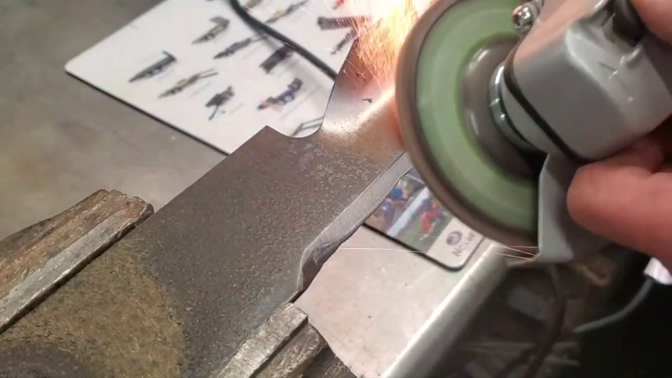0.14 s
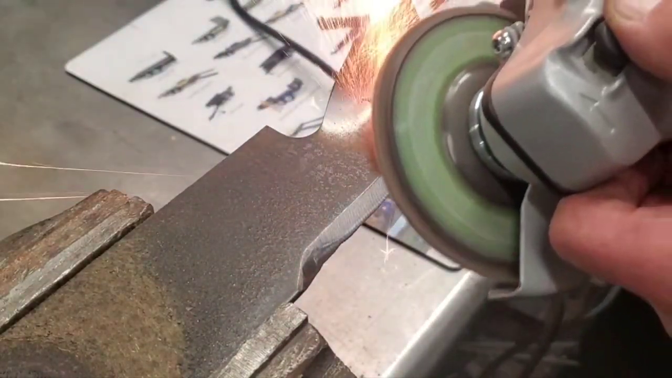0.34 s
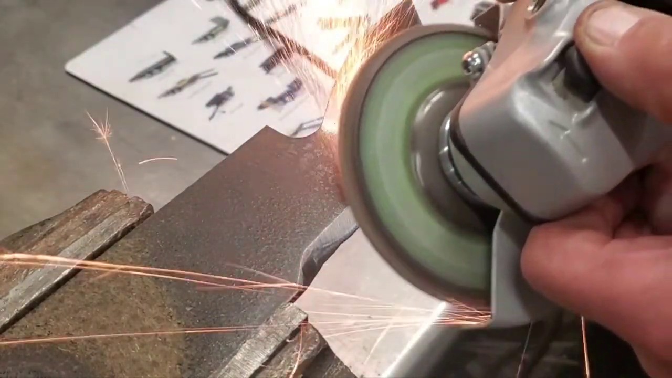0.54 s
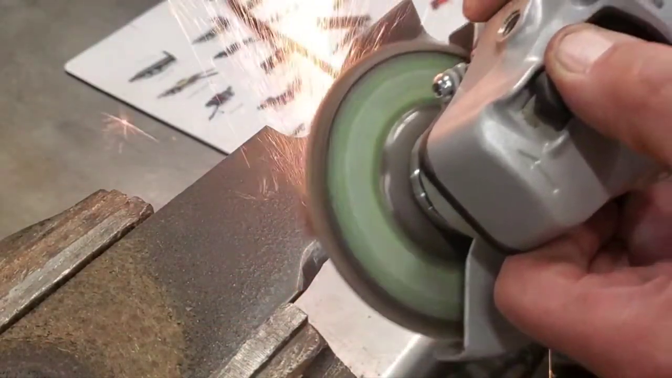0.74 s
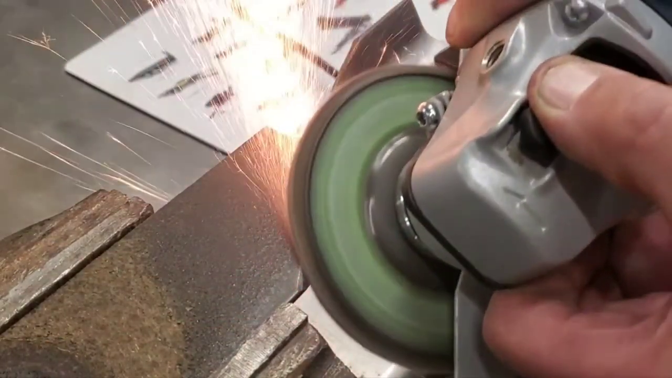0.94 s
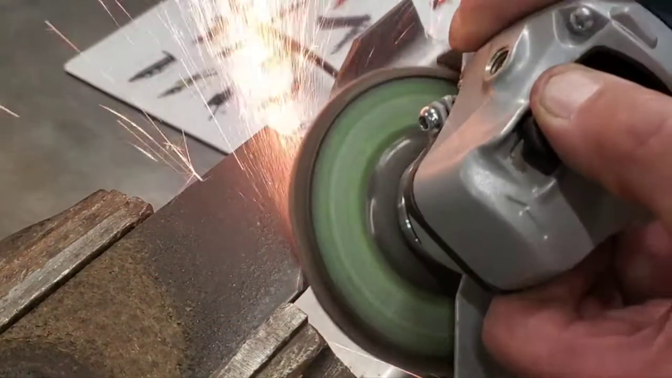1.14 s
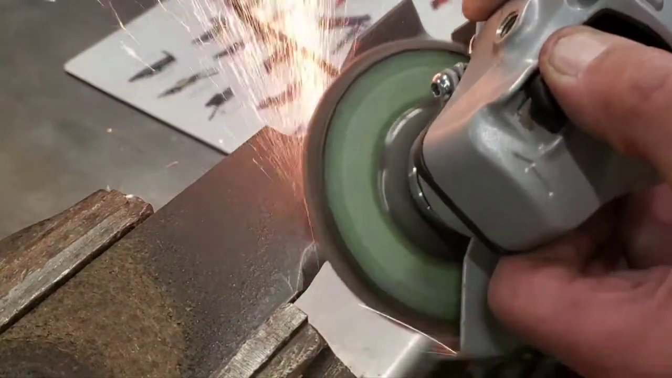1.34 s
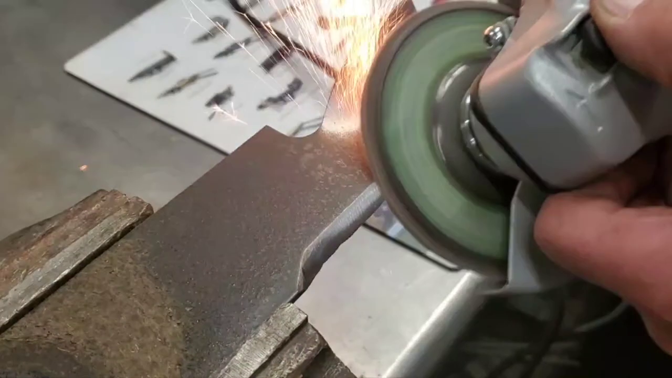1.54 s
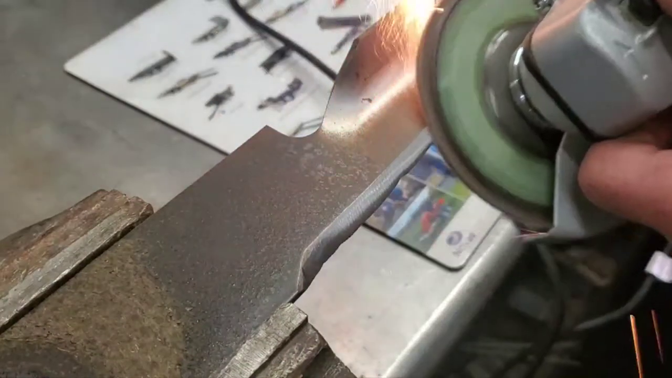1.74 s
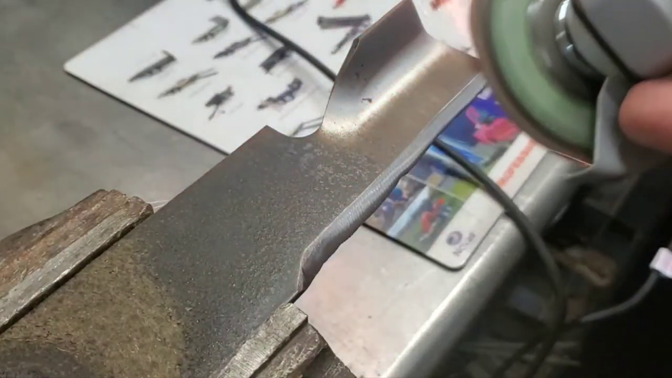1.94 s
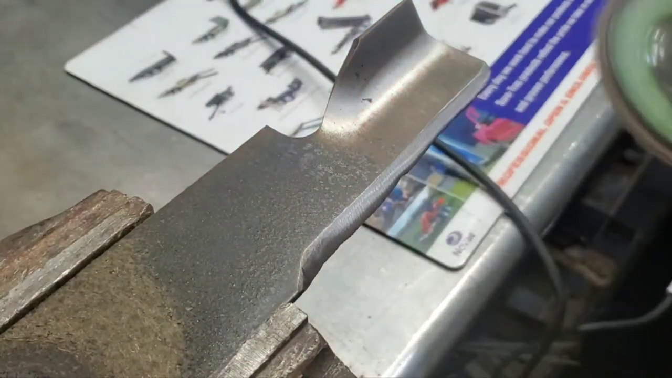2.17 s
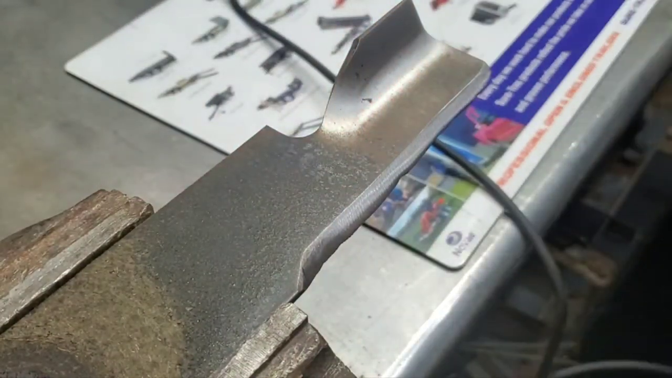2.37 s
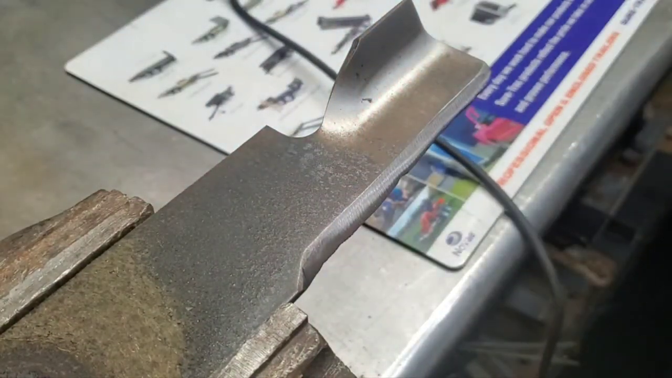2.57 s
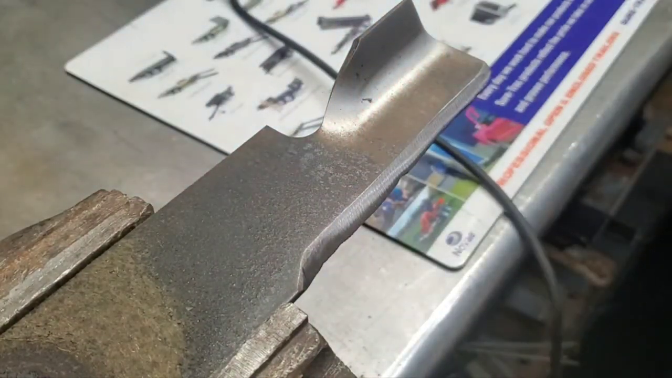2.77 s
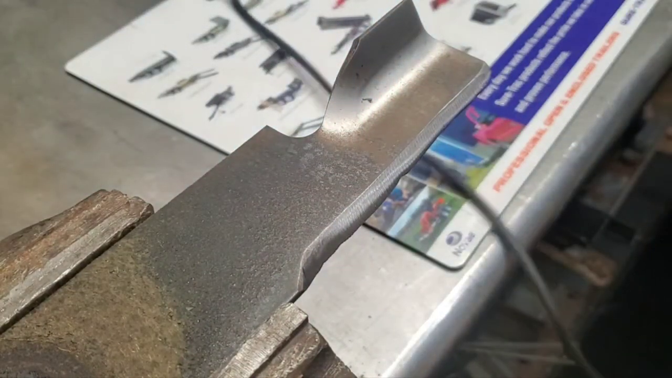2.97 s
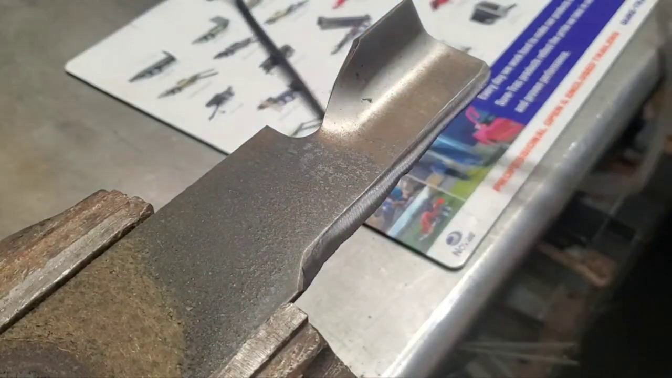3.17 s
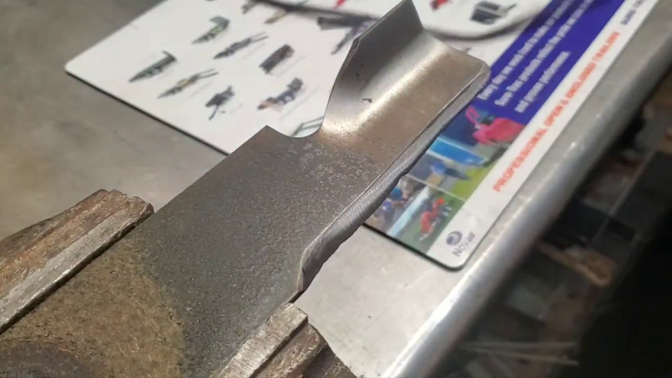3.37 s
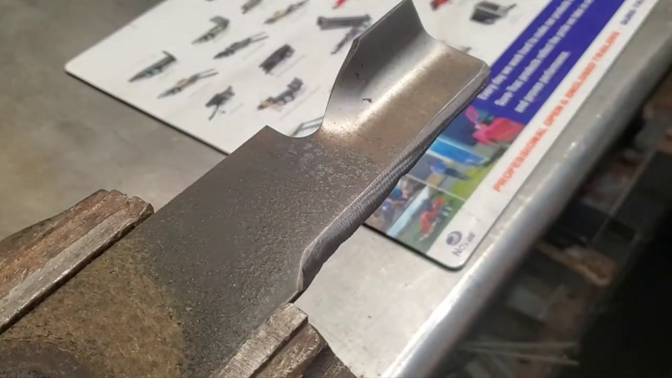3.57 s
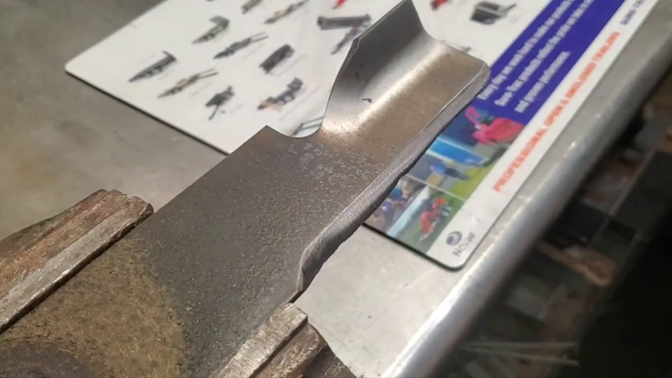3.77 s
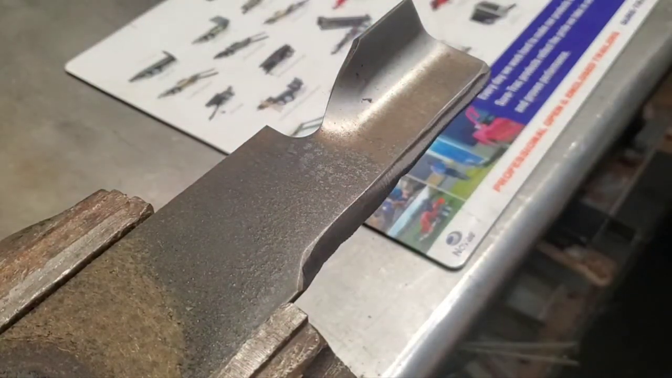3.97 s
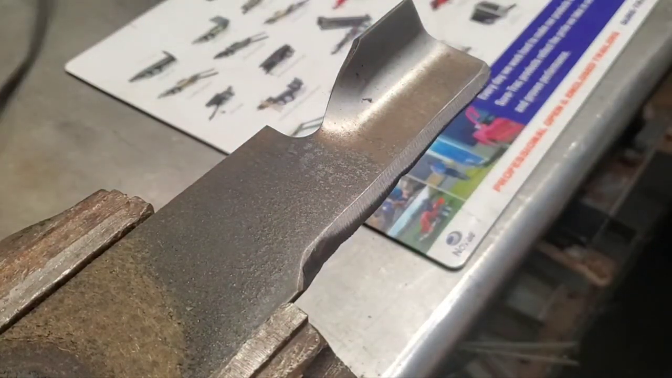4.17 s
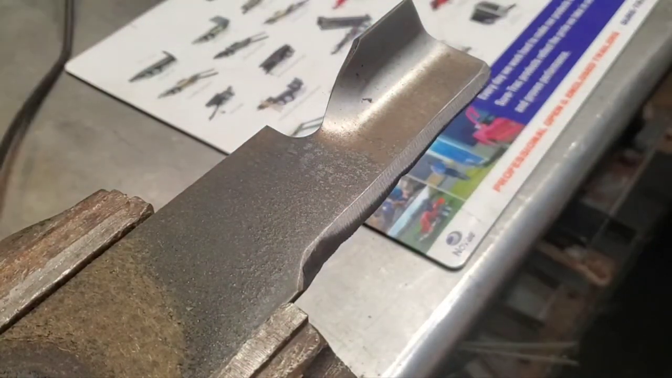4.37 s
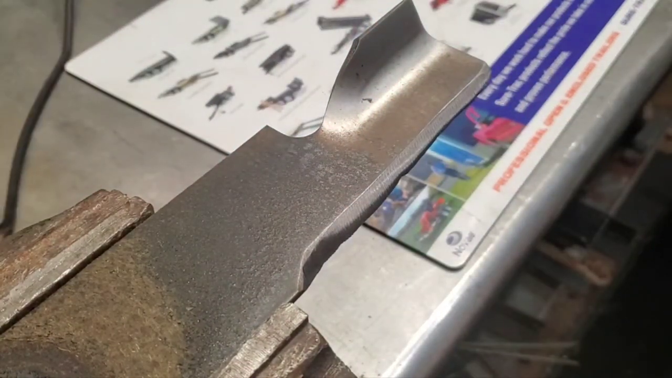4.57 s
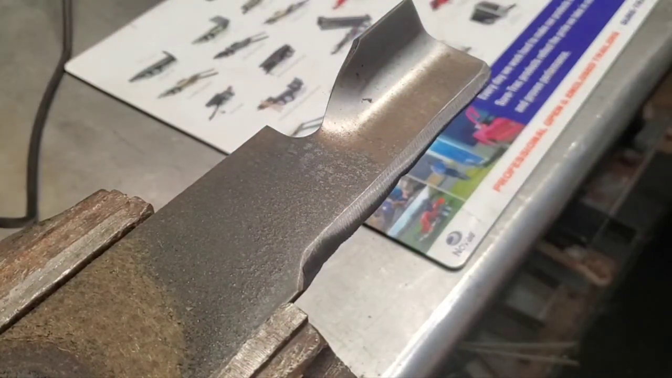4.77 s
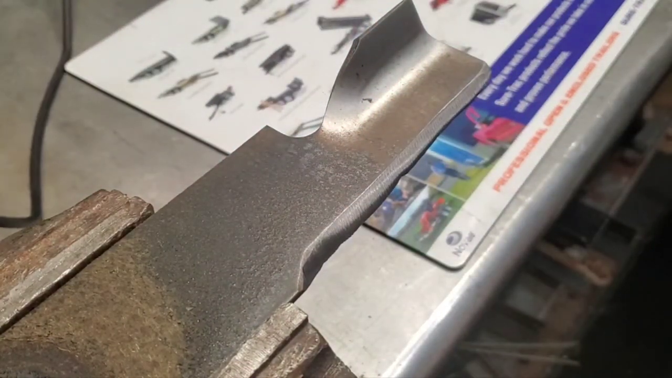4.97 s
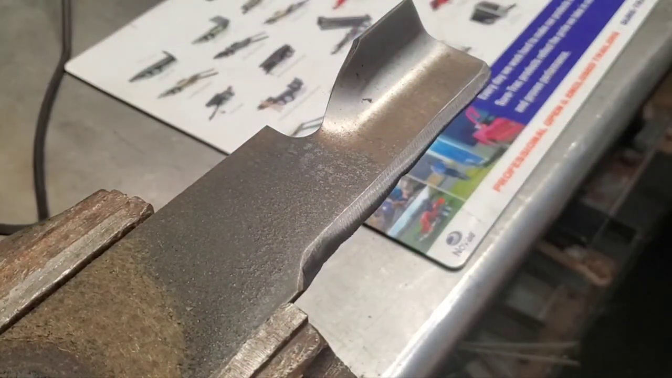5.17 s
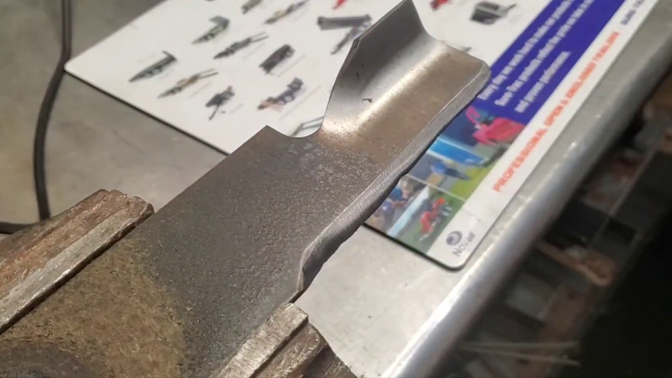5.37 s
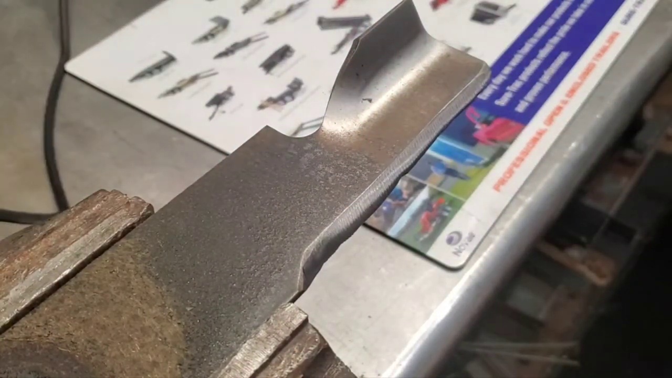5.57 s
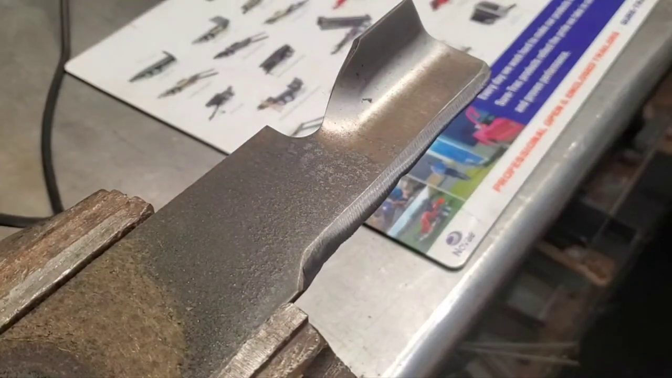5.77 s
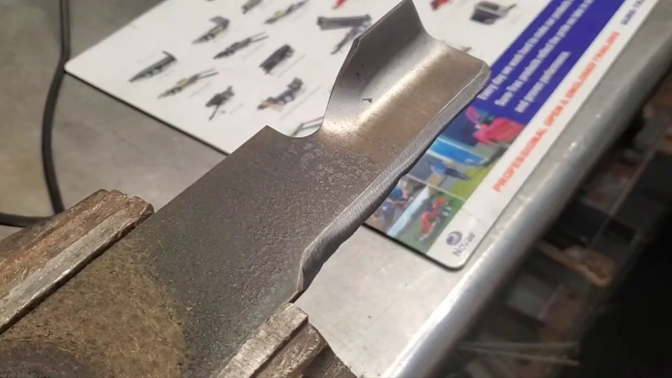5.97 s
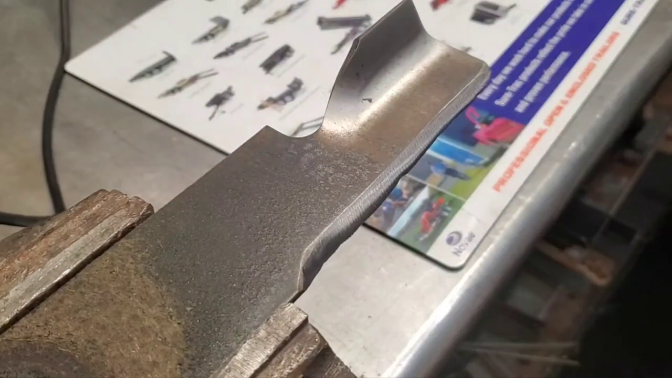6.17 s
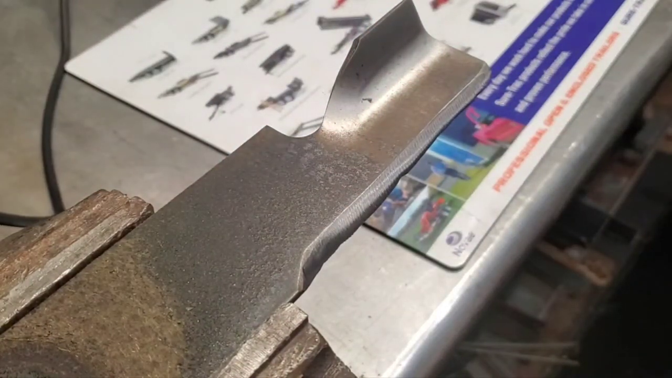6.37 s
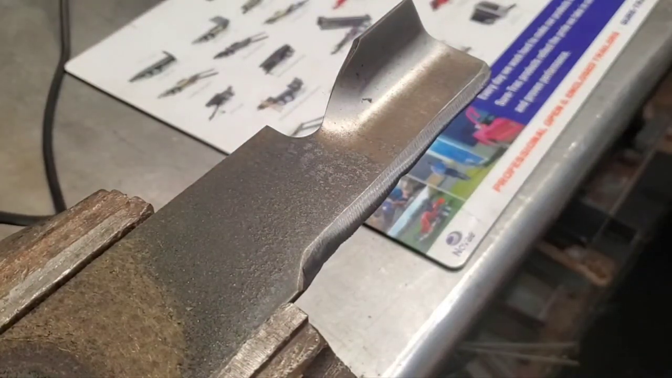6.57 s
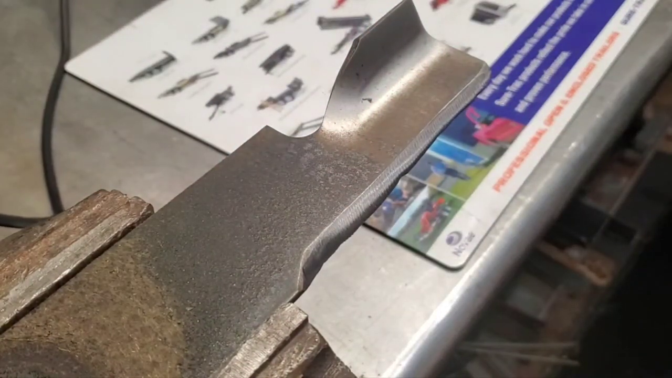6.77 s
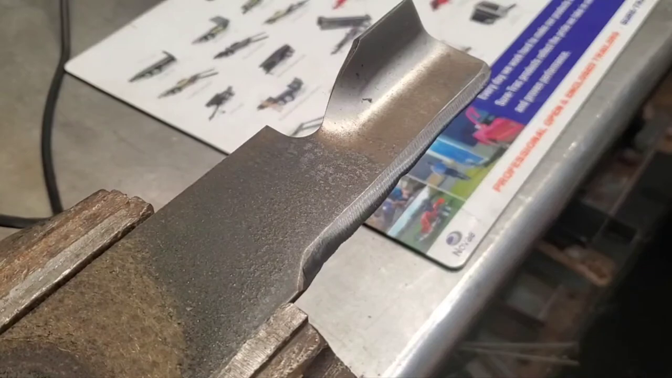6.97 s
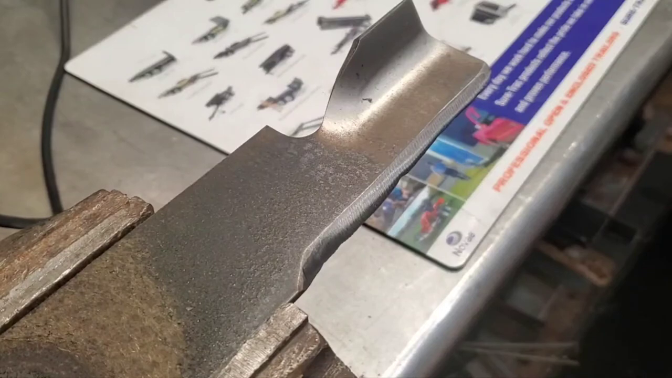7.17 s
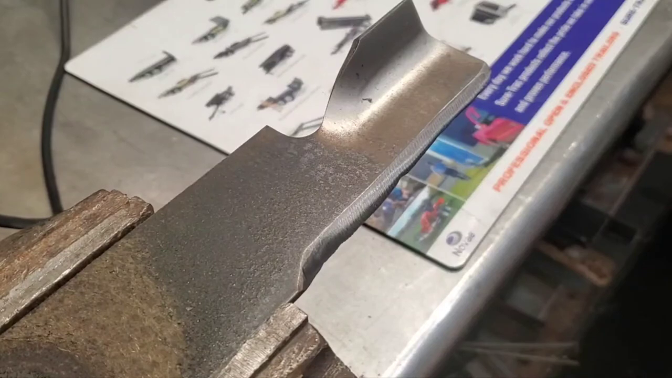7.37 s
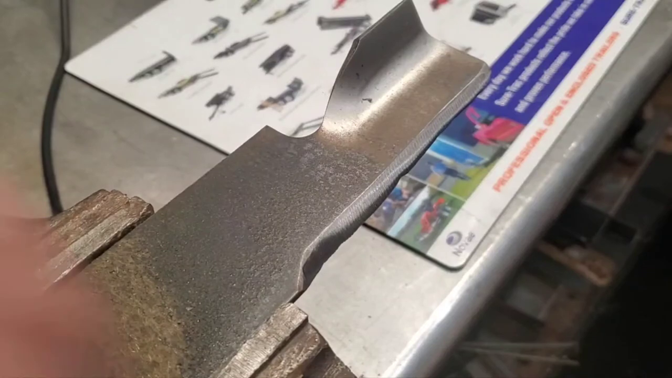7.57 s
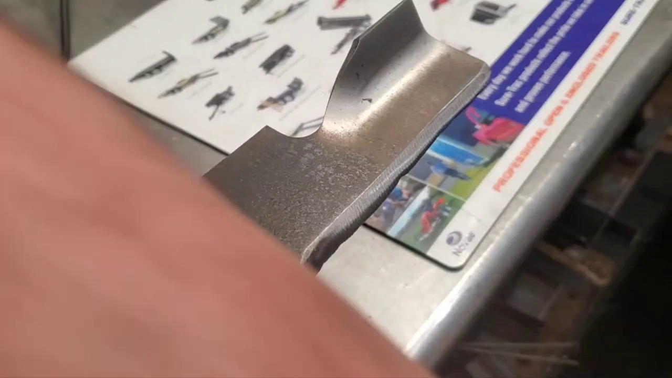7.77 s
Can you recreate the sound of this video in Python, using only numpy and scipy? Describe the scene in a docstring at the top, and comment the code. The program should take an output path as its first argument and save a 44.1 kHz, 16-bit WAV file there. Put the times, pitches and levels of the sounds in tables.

```python
"""A harsh hiss and gear whine over ringing steel: an angle grinder's flap disc sharpens a blade
clamped in a vise, close by in a garage. It lifts off, is switched off and coasts down, its bevel
gears clacking while it is carried aside and the cord knocks on the bench. After a few soft
shuffles the starting current slams the gears into a rattle; the motor runs free for a second,
fan rushing and brushes sizzling, and is switched off once more."""
import sys
import numpy as np
from scipy import signal
from scipy.fft import rfft, irfft, next_fast_len
from scipy.io import wavfile
from scipy.ndimage import uniform_filter1d, map_coordinates

SR = 44100
rng = np.random.default_rng(int(sys.argv[2]) if len(sys.argv) > 2 else 0)


def materialize(psi):
    """Save the field psi as 16-bit PCM at rate SR to the path in sys.argv[1].

    A 1-D psi becomes a single channel; in a 2-D psi each row is a channel.
    """
    bounded = np.clip(np.atleast_2d(psi).T, -1, 1)
    quanta = np.round(bounded * 32767).astype(np.int16)
    wavfile.write(sys.argv[1], SR, quanta)


N = 345296
T = np.arange(N) / SR

PINION_TEETH, CROWN_TEETH, MAINS_HZ = 9, 32, 60
FREE_HZ = 550  # rotor speed the unloaded motor heads for
LIFTED_S, SWITCH_OFF_S, SWITCH_ON_S, SWITCH_OFF_AGAIN_S = 2.228, 2.21, 6.468, 7.69

# broad colour of the gearbox shell: freq_hz, level_db
SHELL_COLOUR = [(450, -10), (1400, -9), (1900, 0.5), (2500, 1), (3200, 4), (5000, 1), (6000, -18),
                (6900, -6.5), (7800, -29.5), (13000, -11.5), (16000, -14)]
# ringing modes of the gearbox shell: pitch_hz, width_hz, level_db
SHELL_MODES = [(543, 35, -2.5), (2054, 280, -4), (3185, 150, -1.5), (4013, 194, 0.5), (4334, 62, 1),
               (5070, 99, -5.5), (6850, 140, -12)]


def amp(db):
    """Decibels to gain."""
    return 10 ** (np.asarray(db) / 20)


def unit(x):
    """Scales to rms 1."""
    return x / np.sqrt(np.mean(x ** 2) + 1e-20)


def levelled(x, size=5000):
    """Holds the running rms, taken over size samples, near 1."""
    return x / np.sqrt(uniform_filter1d(x ** 2, size=size))


def curve(rows, column=1):
    """One column of a table, joined by straight lines in time."""
    rows = np.array(rows)
    return np.interp(T, rows[:, 0], rows[:, column])


def gate(start_s, end_s, ramp_s):
    """1 between start and end, with short ramps."""
    return np.clip(np.minimum(T - start_s, end_s - T) / ramp_s, 0, 1)


def spectrum(points, hz):
    """Reads a table on a log-frequency axis."""
    f, value = np.transpose(points)
    return np.interp(np.log(hz + 1), np.log(f + 1), value)


def filtered(x, response):
    """Applies a frequency response given as a function of Hz."""
    size = next_fast_len(N + 8192)
    return irfft(rfft(x, size) * response(np.fft.rfftfreq(size, 1 / SR)), size)[..., :N]


def coloured(x, points):
    """Minimum-phase EQ through points of freq_hz, level_db."""
    log_gain = np.log(amp(spectrum(points, abs(np.fft.fftfreq(4096, 1 / SR)))))
    taps = np.fft.ifft(np.exp(np.conj(signal.hilbert(log_gain)))).real
    return signal.oaconvolve(x, taps[:len(taps) // 2])[:N]


def ring(x, modes):
    """A bank of steady resonances, each given as pitch_hz, width_hz, level_db."""
    return filtered(x, lambda f: sum(amp(db) * 1j * f * width / (hz ** 2 - f ** 2 + 1j * f * width)
                                     for hz, width, db in modes))


def resonate(x, hz, width_hz):
    """A resonance whose centre follows the curve hz."""
    carrier = np.exp(2j * np.pi * np.cumsum(hz) / SR)
    pole = np.exp(-np.pi * width_hz / SR)
    return 2 * (carrier * signal.lfilter([(1 - pole) ** 2], [1, -2 * pole, pole ** 2], x / carrier)).real


def white():
    """White noise."""
    return rng.standard_normal(N)


def wander(rate_hz):
    """Smooth random drift of rms 1."""
    return unit(filtered(white(), lambda f: np.exp(-(f / rate_hz) ** 2)))


def tone(turns):
    """A sine of rms 1 and random phase."""
    return np.sqrt(2) * np.sin(2 * np.pi * (turns + rng.random()))


def throb(turns, depth):
    """One swell a turn, of mean power 1; a greater depth sharpens it to a blow."""
    return levelled(np.exp(depth * np.cos(2 * np.pi * turns)), size=2205)


def bursts(rows, rise_s, decay_s):
    """Noise that swells and dies at every row of start_s, level_db."""
    level, t = np.zeros(N + SR), np.arange(SR // 2) / SR
    shape = (1 - np.exp(-t / rise_s)) * np.exp(-t / decay_s)
    for start_s, db in rows:
        level[round(start_s * SR):][:len(t)] += amp(db) * shape / shape.max()
    return level[:N] * white()


def around(make, shared):
    """A sound from no clear direction: partly the same on both sides."""
    return np.sqrt(shared) * make() + np.sqrt(1 - shared) * np.array([make(), make()])


def coasted(start_hz, t, friction_hz_per_s=78.8, drag_s=3.45):
    """Speed after t seconds without power: dry friction is steady, air drag grows with speed."""
    friction_hz = friction_hz_per_s * drag_s
    return np.maximum((start_hz + friction_hz) * np.exp(-np.maximum(t, 0) / drag_s) - friction_hz, 0)


def rotor_speed(half_speed_s=0.143):
    """Turns per second: dragged by the steel, coasting to rest, spinning up, and coasting again."""
    # the rotor labouring against the steel: time_s, speed_hz
    loaded_speed = [(0, 491), (0.45, 457), (0.75, 442), (1.03, 441), (1.4, 413.5), (1.65, 412.3),
                    (1.92, 407), (2.1, 411), (2.21, 424)]
    first_run = coasted(curve(loaded_speed), T - SWITCH_OFF_S)
    powered_s = np.clip(T, SWITCH_ON_S, SWITCH_OFF_AGAIN_S) - SWITCH_ON_S
    spin_up = FREE_HZ * powered_s / (powered_s + half_speed_s)
    return first_run + coasted(spin_up, T - SWITCH_OFF_AGAIN_S)


def current(speed, running):
    """Share of the full starting current, which falls as the motor gains speed."""
    return running * np.clip(1 - speed / FREE_HZ, 0, 1)


def grinding(disc, contact, load, grit_memory=0.37, grains_per_turn=400):
    """Returns scrape and ring: the same wearing grit passes each turn, and the flaps slap the blade."""
    # hiss of the grit: freq_hz, level_db
    grit_colour = [(110, -5.5), (300, -5.5), (700, -5), (1300, 6), (4500, -6), (5600, 1.5), (12000, 6),
                   (16000, 4.5)]
    # ring of the clamped blade: pitch_hz, width_hz, level_db
    blade_modes = [(692, 18, -10), (900, 500, -24), (1267, 230, -16), (1499, 20, 0)]
    # higher blade modes, scraped by the grit under load: pitch_hz, width_hz, level_db
    shrill_modes = [(3080, 350, 4), (7320, 190, 5.5), (8370, 260, 0)]
    # how freely the blade rings as the disc travels along it: time_s, level_db
    ringing = [(0, -10), (.65, -1.5), (.73, 2.5), (.92, 5), (1.02, -17), (1.6, 0.5), (2.2, -4)]
    grains = rng.standard_normal((int(disc[-1]) + 2, grains_per_turn))
    track = signal.lfilter([1], [1, -grit_memory], grains, axis=0).ravel()  # repeats comb the hiss
    scratch = unit(map_coordinates(track, [disc * grains_per_turn], mode="nearest"))
    hiss = unit(coloured(scratch * throb(disc, depth=0.85) * amp(0.92 * wander(24)), grit_colour))
    shrill = load * ring(scratch, shrill_modes)
    slaps = sum(tone(k * disc) for k in range(4, 19))
    blade = ring(slaps * amp(2 * wander(5.1)), blade_modes)
    bite = contact * amp(-29)
    return bite * (amp(2) * hiss + amp(3.5) * shrill), bite * amp(curve(ringing) - 4) * blade


def gear_whine(speed, rotor, disc, contact, load, running, loaded_db=-37, start_db=-27, idle_db=-57.5):
    """The mesh whines with torque, with sidebands from the wobbling crown wheel."""
    # tones of rotor and gears: rotor_multiple, level_db
    orders = [(8, -2), (9, 6), (10, 1)]
    # the hand leans in once on each pass along the blade: centre_s, boost_db
    pushes = [(0.48, 6.1), (1.42, 2.1)]
    wobble = 1 + 0.5 * tone(disc) + 0.47 * tone(2 * disc)
    whine = sum(amp(db + 2 * wander(6)) * tone(round(k) * rotor + 0.073 * wander(250))
                for k, db in orders)
    push_db = sum(db * np.exp(-((T - centre_s) / 0.47) ** 2) for centre_s, db in pushes)
    # a hard push brings out the sideband just below the mesh tone
    sideband = amp(4) * load * np.clip(push_db / 2, 0, 1) * tone(PINION_TEETH * rotor - disc)
    meshing = np.clip(speed / 400, 0, 1) ** 5  # slow teeth knock instead of singing
    torque = contact * amp(loaded_db + push_db) + current(speed, running) * amp(start_db) + amp(idle_db)
    return torque * amp(wander(240)) * meshing * (whine * wobble + sideband)


def shell_band(f, low_slope):
    """Response of the band that the gearbox shell lets through."""
    return (1 - 1 / (1 + (f / 1500) ** low_slope)) / (1 + (f / 7100) ** 20)


def mesh_whirr(blows, speed):
    """Struck teeth ring near multiples of the mesh rate, loudest where these cross a shell mode."""
    mesh_hz = np.maximum(PINION_TEETH * speed, 1600)
    slowness = np.clip(1 - speed / 520, 0, 0.5)  # slow teeth strike with a stronger octave
    mesh = resonate(blows, 1.03 * mesh_hz, width_hz=1370)
    mesh += amp(-5.5 + 25.7 * slowness) * resonate(blows, 2 * mesh_hz, width_hz=1200)
    mesh += amp(-8) * resonate(blows, 3 * mesh_hz, width_hz=2100)
    mesh = filtered(mesh, lambda f: shell_band(f, low_slope=6))
    return np.clip(speed / 190, 0, 1) * (amp(9.5) * mesh + amp(7.5) * ring(mesh, SHELL_MODES))


def gear_chatter(speed, disc, crests, running, contact, loaded_db=-26.5, free_db=-28, coast_db=-35):
    """Loose teeth strike at random, shaking the mesh, the bearings and the shell."""
    # fits in which the coasting gears rattle hard: start_s, end_s, boost_db
    fits = [(3.32, 3.48, 2.5), (3.795, 3.883, 5.5), (4.14, 4.215, 5), (4.348, 4.422, 6)]
    strikes_per_s = 1.5 * speed + (running + contact) * 4000
    strikes = (rng.random(N) < strikes_per_s / SR) * amp(2 * np.minimum(rng.exponential(1, N), 2))
    force = signal.lfilter([1], [1, -np.exp(-1 / (0.001 * SR))], strikes) + 0.2
    disc_phase = disc - np.interp(7.605, T, disc - crests)  # in step with the torque ripple at 7.605 s
    blows = white() * force * throb(disc_phase, depth=0.43) * throb(crests, depth=running * 0.51)
    # near full speed the ripple beats against the disc's turn and throws the teeth loose in pulses
    beat = running * np.clip((speed - 452) / 15, 0, 1) * np.cos(2 * np.pi * (disc_phase - crests))
    # the coasting rotor shakes in its bearings around 145 turns a second
    shake = np.exp(-((speed - 145) / 98) ** 2) * np.minimum(speed / 2, 1) * (T < SWITCH_ON_S)
    bearings = shake * ring(blows, [(1110, 360, 9.9), (2040, 670, 8.8)])
    singing = running * np.clip(speed / 430, 0, 1) ** 10 * ring(blows, [(4040, 60, 22)])
    rasp = np.maximum(beat, 0) * ring(blows, [(4960, 210, 18)])
    shell = coloured(blows, SHELL_COLOUR) + amp(2) * ring(blows, SHELL_MODES)
    chatter = levelled(mesh_whirr(blows, speed) + bearings + singing + rasp + shell)
    fits_db = wander(19) + sum(db * gate(start, end, ramp_s=0.0098) for start, end, db in fits)
    coasting = (1 - contact - running) * np.hypot((speed / 400) ** 1.7, shake) * amp(coast_db + fits_db)
    torque_db = 12 * current(speed, running) + 2.5 * beat
    powered = running * np.clip((speed - 260) / 130, 0, 1) * amp(free_db + torque_db)
    return chatter * (contact * amp(loaded_db) + powered + coasting)


def fan_rush(speed):
    """The cooling fan blows through vents on either side, louder with speed."""
    # rush of the fan: freq_hz, level_db
    fan_colour = [(130, -26), (800, -6), (2000, 0), (4200, 4.5), (9000, -8), (16000, -7)]
    rush = around(lambda: unit(coloured(white(), fan_colour)), shared=0.27)
    return amp(-27.5) * (speed / 450) ** 1.84 * rush


def unbalance_hum(speed, rotor, disc, contact):
    """Rotor and disc each hum once a turn, the disc more when it presses on the steel."""
    # rotor hum, lifted by a resonance of the casing: speed_hz, level_db
    hum_levels = [(130, -67), (220, -66), (360, -55.5), (412, -39.5), (500, -43)]
    rotor_hum = amp(np.interp(speed, *np.transpose(hum_levels))) * tone(rotor)
    disc_hum = amp(-55.5 + 3 * contact) * (speed / 450) ** 2 * tone(disc)
    return (rotor_hum + disc_hum) * amp(wander(20))


def room_tone():
    """The still air of the garage, a faint dark noise all around."""
    # colour of the air: freq_hz, level_db
    air_colour = [(25, -37), (85, -6), (200, -13), (540, -7.5), (4600, -19), (8000, -30.5), (16000, -33)]
    return amp(-51) * around(lambda: unit(coloured(white(), air_colour)), shared=0.43)


def blade_squeal(rotor, load):
    """The loaded blade squeals at twice the mesh rate, and two rotor orders higher when pressed hard."""
    octave = 2 * PINION_TEETH * rotor + 0.054 * wander(89)
    return amp(-35.5) * load * tone(octave) + amp(-42) * load ** 2 * tone(octave + 2 * rotor)


def gear_clacks(speed, running, rebound_s=0.0082, rebound_db=-13):
    """Teeth knock and bounce back; fast ones ring at the mesh rate, slow ones wake the shell."""
    # hard knocks of the teeth across their play: start_s, level_db
    clacks = [(2.499, -15.5), (2.539, -19), (2.546, -14), (2.5717, -20), (2.801, -18), (3.149, -26),
              (3.4395, -17.5), (3.558, -21), (3.7592, -22.5), (3.7992, -20), (3.8078, -15), (3.825, -13),
              (3.85, -16.5), (3.8678, -13), (3.949, -19.5), (3.9807, -20.5), (4.01, -16), (4.1085, -16.5),
              (4.1538, -23), (4.1674, -10.5), (4.1909, -11), (4.206, -16), (4.2423, -14.5), (4.2902, -14.5),
              (4.314, -16.5), (4.331, -20), (4.3471, -12.5), (4.391, -16), (4.441, -19.5), (4.47, -16.5),
              (4.503, -18.5), (4.5463, -19.5), (4.5739, -19.5), (4.594, -18), (4.6127, -17),
              (4.6344, -17.5), (4.696, -21), (4.7089, -11.5), (4.729, -19.5), (4.794, -18.5), (4.82, -17.5),
              (4.853, -22), (4.8783, -16), (4.894, -18), (4.9367, -20), (4.956, -22), (4.9852, -23),
              (5.0213, -23), (5.0414, -23.5), (5.0995, -11), (5.12, -16.5), (5.1438, -15.5), (5.209, -21),
              (5.296, -26), (5.326, -21.5), (6.4685, -20), (6.4753, -16.5), (6.702, -20)]
    delays = rebound_s * (0.5 + rng.random(len(clacks)))
    rebounds = [(start_s + delay, db + rebound_db) for (start_s, db), delay in zip(clacks, delays)]
    impacts = bursts(clacks + rebounds, rise_s=0.0007, decay_s=0.0015)
    pings = sum(ring(impacts * amp(3.5 * wander(14)), [mode]) for mode in SHELL_MODES)
    fast = (1 - running) * np.clip(speed / 370, 0, 1) ** 4
    sound = (1 - fast) * (coloured(impacts, SHELL_COLOUR) + amp(1.5) * pings)
    sound += fast * amp(13.5) * resonate(impacts, PINION_TEETH * speed, width_hz=630)
    # the small shell radiates little bass or top
    return filtered(sound, lambda f: f ** 2 / (f ** 2 + 280 ** 2) / np.sqrt(1 + (f / 8500) ** 4))


def cord_knocks():
    """The cord hits the bench in short thuds, dull or bright, and the top drums on in its low mode."""
    # knocks of the cord: start_s, level_db, cutoff_hz
    knocks = [(4.051, -13, 820), (4.249, -18.5, 650), (4.808, -18, 2190)]
    # colour of the bench: freq_hz, level_db
    bench_colour = [(60, -12), (200, -8), (550, -1.5), (2000, -5)]
    thuds = np.zeros(N)
    for start_s, db, cutoff_hz in knocks:
        hit = bursts([(start_s, db)], rise_s=0.0005, decay_s=0.02)
        thuds += filtered(hit, lambda f: 1 / (1 + 1j * f / cutoff_hz - (f / cutoff_hz) ** 2))
    drum = ring(bursts([row[:2] for row in knocks], rise_s=0.018, decay_s=0.15), [(105, 79, -8)])
    return amp(3) * coloured(thuds, bench_colour) + drum


def soft_shuffles():
    """Brief, dull puffs of noise in the pause."""
    # the shuffles: start_s, level_db
    shuffles = [(5.7, -45.5), (5.885, -43.5), (6.08, -40.5), (6.392, -43)]
    # their muffled colour: freq_hz, level_db
    shuffle_colour = [(80, 2), (540, -1), (4500, -6), (9000, -26)]
    return amp(9) * around(
        lambda: coloured(bursts(shuffles, rise_s=0.0064, decay_s=0.07), shuffle_colour), shared=0.28)


def start_rattle(speed, crests, running, slam_decay_s=0.0021):
    """Each crest of the starting current slams the teeth together; their ring climbs with the mesh."""
    # loudness of the rattle as the motor starts: time_s, level_db
    rattle_levels = [(6.47, -16.5), (6.5, -18), (6.62, -19.5), (6.69, -26.5), (6.75, -22), (6.82, -22),
                     (6.95, -30), (7.1, -72)]
    # colour of a slam: freq_hz, level_db
    slam_colour = [(1400, -4), (1800, -2.5), (4500, 3.5), (6700, -4), (7600, -2), (16000, 4)]
    lag_cycles = 0.17 * (speed - 200) / 200  # slams fall behind the current as speed builds
    since_slam_s = ((crests - lag_cycles) % 1) / (2 * MAINS_HZ)
    blows = white() * (np.exp(-since_slam_s / slam_decay_s) + 0.068) * amp(0.7 * wander(56))
    mesh_hz = PINION_TEETH * speed
    mesh = resonate(blows, np.maximum(1.04 * mesh_hz, 1800), width_hz=700)
    octave = resonate(blows, 2 * mesh_hz, width_hz=620)
    edge = ring(blows, [(5880, 360, -1.5), (6650, 280, 0)])  # hard blows wake the shell's high modes
    rattle = coloured(blows, slam_colour) + amp(6.5) * mesh + amp(7) * octave + amp(4.5) * edge
    rattle = filtered(rattle, lambda f: shell_band(f, low_slope=8) + 0.1)
    return running * amp(curve(rattle_levels)) * levelled(rattle)


def casing_jolt():
    """The starting torque jolts the whole casing into a short clunk."""
    kick = bursts([(SWITCH_ON_S + 0.0095, -10)], rise_s=0.0029, decay_s=0.02)
    return ring(kick, [(490, 50, 1), (720, 88, -0.75)])


def brush_sizzle(speed, crests, running):
    """After the restart the carbon brushes spark at each crest of the current, with a spell of arcing."""
    # sizzle of the sparks: freq_hz, level_db
    spark_colour = [(2000, -27), (6500, -15), (9000, -11), (12500, -3.5), (16000, -10)]
    crackle = throb(crests, depth=0.28) * amp(1.9 * wander(110))
    sparks = around(lambda: unit(coloured(white() * crackle, spark_colour)), shared=0.059)
    arcing_db = 9.1 * gate(6.92, 7.29, ramp_s=0.019)
    return amp(-21.5 + arcing_db) * (speed / 450) ** 2 * np.sqrt(current(speed, running)) * sparks


def garage_reverb(x):
    """Dense reflections, different on each side, the treble dying first."""
    # decay of the garage: freq_hz, t60_s
    decay_times = [(150, 1), (1000, 0.75), (4000, 0.19), (14000, 0.31)]
    hz, t, noise = signal.stft(rng.standard_normal((2, SR // 2)), SR, nperseg=256)
    decay = amp(-60 * t / spectrum(decay_times, hz)[:, None])
    early = 1 + 1.8 * np.exp(-t / 0.015)  # bench and vise are close
    tail = signal.istft(noise * decay * early * (t > 0.002), SR, nperseg=256)[1]
    return signal.fftconvolve(x[None], tail / np.linalg.norm(tail[0]), axes=1)[:, :N]


def placed(stereo):
    """The moving grinder reaches left and right at different times and levels."""
    # where the grinder is held: time_s, left_delay_ms, left_over_right_db
    path = [(0.3, -0.04, 1), (1.3, -0.024, 8), (2.2, 0.15, -1), (2.95, 0.4, -6.5), (3.35, 0.068, 1.5),
            (4.05, 0.05, 1), (4.8, -0.36, 17.5), (6.6, -0.38, 8.5), (7.7, -0.41, 8)]
    lag, balance_db = curve(path) * SR / 1000, curve(path, column=2)
    return np.array([
        amp(share * balance_db) * map_coordinates(side, [np.arange(N) - share * lag], mode="nearest")
        for share, side in zip((0.5, -0.5), stereo)])


def scene():
    """One rotor speed drives all the grinder's layers; handling sounds and the garage surround it."""
    speed = rotor_speed() * (1 + 0.00065 * wander(14.5))
    rotor = np.cumsum(speed) / SR  # rotor and disc count turns
    disc = rotor * PINION_TEETH / CROWN_TEETH
    crests = 2 * MAINS_HZ * (T - SWITCH_ON_S)  # the current crests twice a mains cycle
    running = gate(SWITCH_ON_S, SWITCH_OFF_AGAIN_S, ramp_s=0.015)  # the free run
    contact = np.clip((LIFTED_S - T) / 0.11, 0, 1)  # disc on the steel
    load = contact * np.clip((450 - speed) / 38, 0, 1)  # how hard the steel drags the motor down
    jolt = casing_jolt()
    gears = gear_whine(speed, rotor, disc, contact, load, running)
    gears += gear_chatter(speed, disc, crests, running, contact)
    slams = gear_clacks(speed, running) + start_rattle(speed, crests, running) + jolt
    scrape, blade = grinding(disc, contact, load)
    knocks, shuffles, air = cord_knocks(), soft_shuffles(), room_tone()
    send = amp(1) * gears + amp(-0.5) * slams + amp(5.5) * scrape + amp(-3) * knocks
    room = garage_reverb(filtered(send, lambda f: f / (f + 350)))  # bass and blade stay close and dry
    vents = fan_rush(speed) + brush_sizzle(speed, crests, running)
    grinder = placed(gears + slams + scrape + blade + vents) + unbalance_hum(speed, rotor, disc, contact)
    return grinder + blade_squeal(rotor, load) + knocks + shuffles + air + room


def record(dry, low_cut_hz=26, ceiling=0.85, high_cut_hz=15850):
    """A low cut, a soft ceiling on the hardest peaks, and a steep high cut."""
    dry = filtered(dry, lambda f: f ** 2 / (f ** 2 + low_cut_hz ** 2))
    limited = dry / (1 + (dry / ceiling) ** 6) ** (1 / 6)
    taps = signal.firwin(511, high_cut_hz, window=("kaiser", 9), fs=SR)
    return signal.oaconvolve(limited, taps[None], "same")


dry = scene()
out = record(dry)
materialize(out)
```